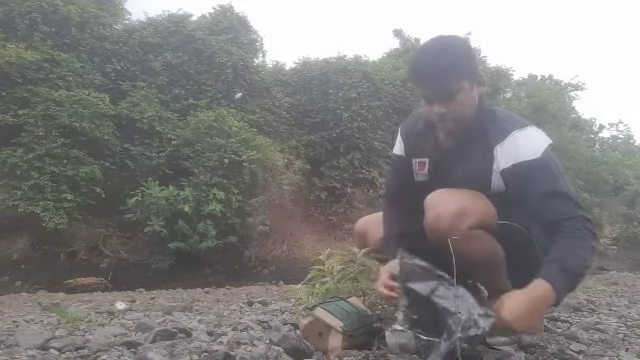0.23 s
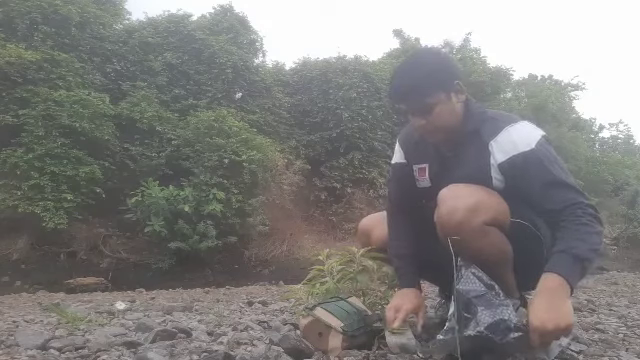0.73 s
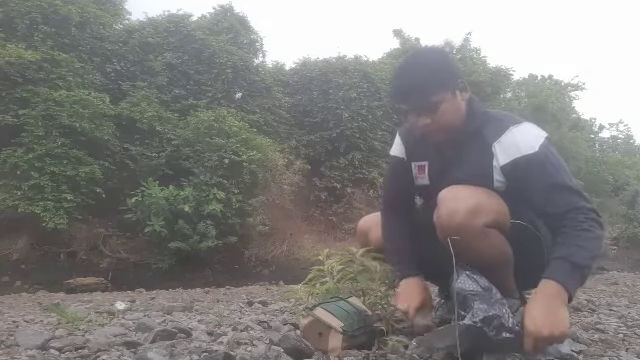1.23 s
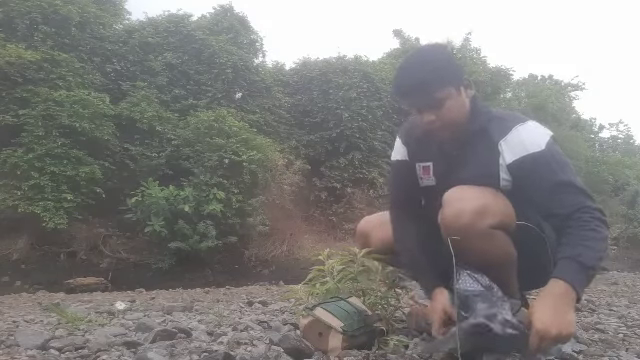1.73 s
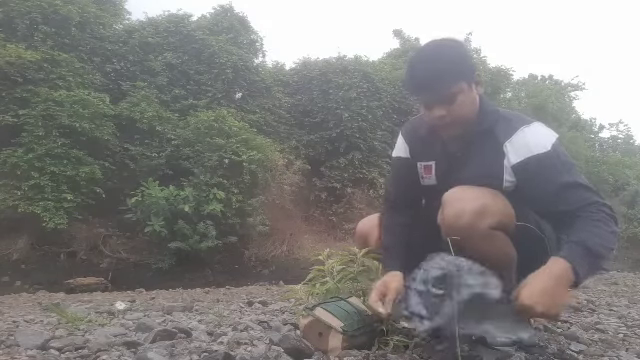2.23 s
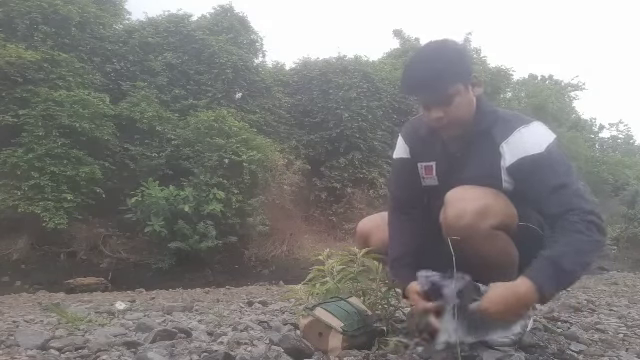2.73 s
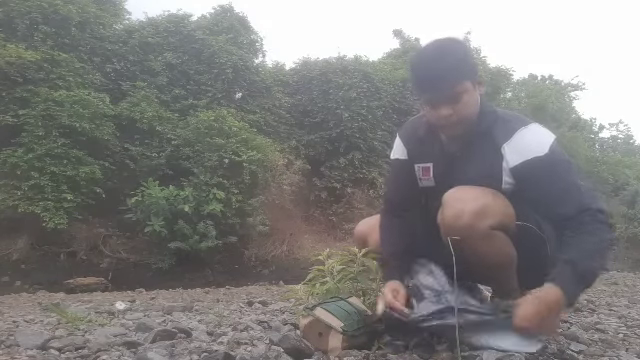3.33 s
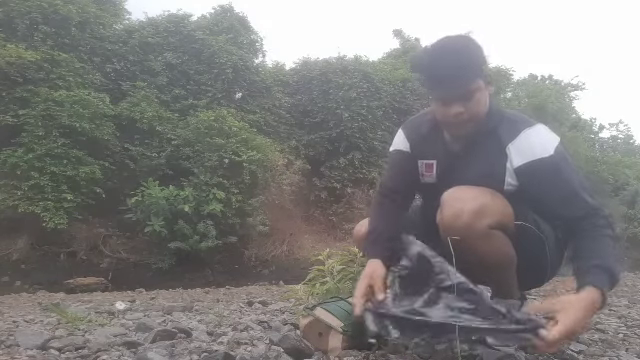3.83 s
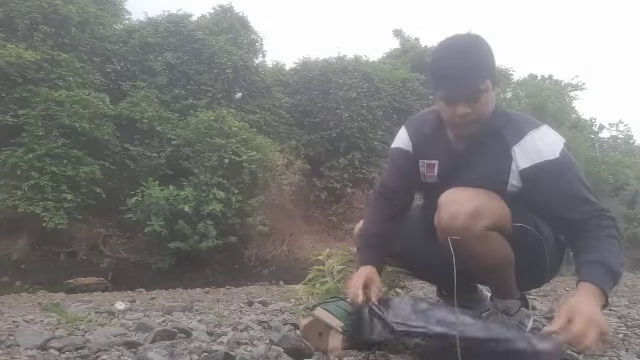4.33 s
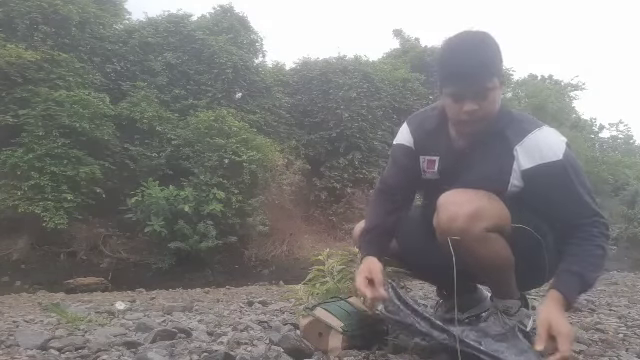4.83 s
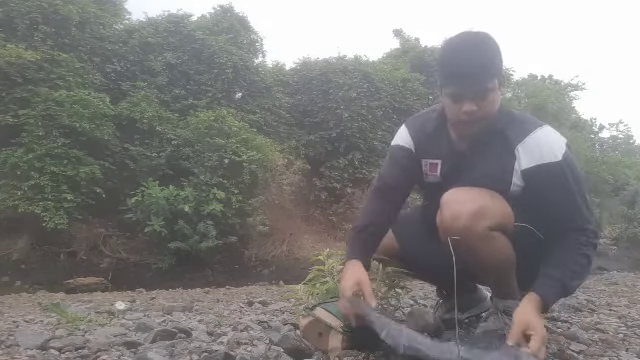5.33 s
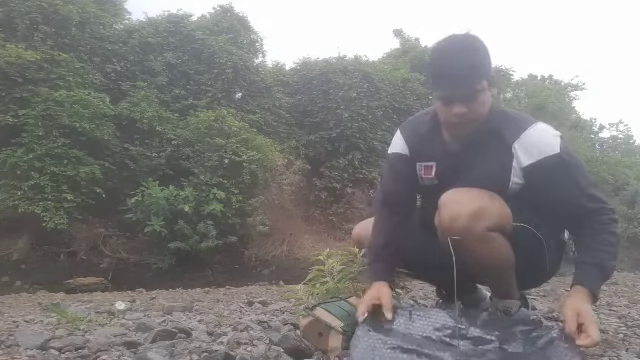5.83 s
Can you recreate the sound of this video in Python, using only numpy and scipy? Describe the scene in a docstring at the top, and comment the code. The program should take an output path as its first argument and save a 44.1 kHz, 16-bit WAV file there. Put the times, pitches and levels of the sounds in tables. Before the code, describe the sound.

Outdoors on stony ground, a small bird keeps chirping one quick phrase from the bushes while thin plastic is handled near the microphone. The crinkling starts lightly, pauses around a single stone clack, then returns in denser, snapping bursts as the sheet is opened out. Finally it is spread with soft low gusts and a few slaps on the ground. The background is a very faint hush.

```python
"""Outdoors on stony ground, the microphone close to a thin plastic sheet being shaken open and spread.
Creases buckle in dense crackling bursts, single folds snap, pockets of the sheet slap the ground and a
stone clacks; each swing pushes a low puff of air at the microphone. From the bushes a small bird repeats
one four-note phrase; a farther one trills once and drops two whistles, over a faint outdoor hush."""
import sys
import numpy as np
from scipy import signal
from scipy.fft import rfft, irfft, next_fast_len
from scipy.io import wavfile
from scipy.ndimage import uniform_filter1d, map_coordinates

SR = 44100
rng = np.random.default_rng(int(sys.argv[2]) if len(sys.argv) > 2 else 0)


def unload_audio(sound):
    """Save the sound as a 16-bit wav file, at the path given as the first command line argument."""
    columns = np.transpose(np.atleast_2d(sound))
    # keep every value between -1 and 1, then stretch to whole-number steps
    steps = np.round(np.clip(columns, -1, 1) * 32767)
    wavfile.write(sys.argv[1], SR, steps.astype(np.int16))


N = 267687

# Effort of the hands, one curve a movement. Each point: time in seconds, effort in dB.
MOVEMENTS = [
    [(0, -52), (.028, -41), (.13, -48), (.17, -55.5), (.23, -50), (.3, -67.5), (.43, -63)],
    [(.45, -53.5), (.52, -49), (.6, -50.5), (.64, -52.5), (.675, -56)],
    [(.69, -62.5), (.83, -76), (1.04, -61), (1.15, -67), (1.25, -82), (1.37, -55), (1.41, -69)],
    [(1.45, -53.5), (1.56, -74), (1.588, -55.5), (1.61, -70.5), (1.8, -76.5)],
    [(1.82, -49.5), (1.95, -42.5), (2.005, -41.5)],
    [(2.02, -37), (2.064, -34), (2.12, -41), (2.17, -37.5), (2.21, -54)],
    [(2.235, -71), (2.38, -51), (2.41, -56)],
    [(2.43, -60), (2.52, -46), (2.58, -53.5)],
    [(2.6, -44.5), (2.69, -41.5), (2.74, -40), (2.82, -36.5), (2.86, -45.5), (2.88, -38.5)],
    [(2.9, -50), (2.974, -43.5), (3.03, -47.5)],
    [(3.07, -54.5), (3.15, -45.5), (3.19, -55.5)],
    [(3.21, -47), (3.29, -44)],
    [(3.31, -42.5), (3.35, -35.5), (3.45, -33), (3.53, -38.5), (3.57, -44)],
    [(3.6, -58), (3.7, -49), (3.77, -50.5)],
    [(3.785, -45.5), (3.82, -42.5), (3.87, -52), (3.96, -50)],
    [(3.98, -42.5), (3.99, -35.5), (4.04, -36.5), (4.25, -37), (4.3, -48.5)],
    [(4.33, -55.5), (4.51, -51), (4.67, -42.5), (4.69, -52)],
    [(4.71, -52), (4.84, -52), (4.88, -53)],
    [(4.91, -70), (5.0, -61), (5.09, -48), (5.2, -55), (5.29, -55.5), (5.34, -66.5), (5.41, -58.5)],
    [(5.43, -41), (5.47, -48.5), (5.61, -34), (5.7, -37.5), (5.765, -33)],
    [(5.785, -41.5), (5.84, -39), (5.9, -36), (5.92, -47.5)],
    [(5.95, -40.5), (6.0, -61.5), (6.07, -45.5)],
]
# What buckles in each movement. Each row: tilt towards large folds in dB, lift of fine creases in dB.
FOLD_BALANCE = [(-0.5, 1.5), (0, 5), (0, -12), (-1.5, -2), (0, 1.5), (1, 6), (1, 13), (-0.5, 4.5),
                (-0.5, 2.5), (-0.5, -0.5), (-0.5, 6.5), (-2, -3.5), (0.5, 0.5), (-4.5, 7), (-1.5, 1.5),
                (0, 2.5), (-1.5, 1), (-5.5, -4.5), (-6, 3), (-2, 0.5), (0.5, -4), (-1.5, -3)]
# The sheet's five ranges, low to high. Each row: frequency in Hz, relative spectral density in dB.
BODY_SPECTRUM = [(120, -6), (250, -4.5), (550, 2.5), (900, -7.5), (1500, -5.5)]
CRACKLE_SPECTRUM = [(450, -9), (750, -5.5), (1300, -4.5), (1800, -1), (2300, -9), (2900, -49)]
CRISP_SPECTRUM = [(2100, -12.5), (2700, 1), (3400, 1), (4800, -5), (6500, -10.5), (8500, -50)]
SIZZLE_SPECTRUM = [(5000, -3), (6800, -0.5), (8000, 0), (11500, -9.5), (13000, -27), (15500, -27)]
SHEEN_SPECTRUM = [(11000, -12), (12500, 3), (15700, -2)]
# Single folds. Each row: start in seconds, ring peak in dB, pitch in Hz, tick against the ring in dB.
FOLD_SNAPS = [(0.023, -27.5, 1200, -6), (0.051, -38, 3570, -2), (.221, -32, 4530, -30),
              (.357, -45.5, 3450, -15), (.4519, -41, 3130, -6), (.508, -32, 3150, -8),
              (0.537, -26.5, 2000, -13), (0.5529, -23.5, 3740, -5.5), (0.5993, -33, 1970, -1.5),
              (0.7424, -41, 3780, -23), (0.9124, -40.5, 2900, -32), (.9847, -45, 2500, -6),
              (1.0184, -43.5, 2280, -20), (1.034, -45, 3060, -8), (1.052, -42, 2975, -22),
              (1.079, -45, 1310, -26), (1.1508, -37.5, 3420, -20), (1.1734, -39.5, 1920, -30),
              (1.3053, -43.5, 2650, -30), (1.363, -35, 2500, -36), (1.416, -37, 2570, -26),
              (1.491, -38.5, 1800, -15), (1.5836, -38, 3030, -16), (1.8192, -35, 1520, -22),
              (1.925, -26.5, 1510, -11), (2.073, -18.5, 1090, 0.5), (2.1375, -16, 2020, -9),
              (2.1837, -22, 5000, -23), (2.212, -35, 2500, -2), (2.2927, -35.5, 3460, -7),
              (2.339, -32.5, 3470, -4), (2.375, -23.5, 3960, -4), (2.569, -33.5, 1910, -22),
              (2.5935, -27.5, 1830, -30), (2.6912, -20.5, 1800, -10), (2.7171, -24.5, 2050, -6),
              (2.7823, -21.5, 1700, -1), (2.816, -27, 1870, 2), (2.8444, -34, 3210, 2),
              (2.8744, -27.5, 1360, -2), (2.964, -31, 2920, -23), (2.9938, -33, 3050, -3),
              (3.2617, -23, 2750, -7), (3.3071, -26, 1660, -2), (3.392, -17, 1940, -3),
              (3.45, -20, 1370, -12), (3.474, -31, 1970, 0), (3.5075, -25.5, 2370, 1),
              (3.686, -30, 3500, -1.5), (3.782, -30, 2830, 2.5), (3.905, -25, 4400, -19),
              (3.9872, -21, 1570, -10), (4.094, -23, 1460, 2), (4.1573, -24, 1530, -12),
              (4.1946, -15.5, 1940, -12), (4.33, -34.5, 4400, -12), (4.5513, -25.5, 2920, -36),
              (4.6626, -27, 1760, -7), (4.7266, -29, 3260, -30), (4.832, -30, 3100, -16),
              (4.8634, -27, 3010, -15), (5.0683, -26, 3210, -5.5), (5.1604, -29.5, 2790, -19),
              (5.28, -29.5, 3630, -10), (5.4252, -23.5, 3120, -19), (5.4515, -23, 2500, -23),
              (5.48, -24.5, 3200, -14), (5.499, -27, 2650, -8), (5.7983, -25, 1800, -10),
              (5.906, -23, 970, -26), (6.026, -36.5, 3050, -17)]
# Pockets hitting the ground. Each row: start in seconds, level in dB, pitch in Hz, t60 in seconds.
POCKET_SLAPS = [(1.436, -31, 300, 0.026), (1.46, -40.5, 290, 0.053), (1.495, -40, 248, 0.032),
                (3.988, -24, 500, 0.014), (5.21, -31, 247, 0.052), (5.222, -29.5, 110, 0.13),
                (5.426, -29, 310, 0.024), (5.798, -18, 598, 0.03), (5.838, -19.5, 745, 0.021),
                (5.9302, -8.5, 562, 0.011), (5.934, -20.5, 181, 0.073), (5.936, -9.5, 496, 0.012)]
# One stone tipping against another. Each row: contact time in seconds, level in dB.
STONE_CONTACTS = [(1.431, -29), (1.432, -20), (1.4343, -20)]
# The stone's modes. Each row: frequency in Hz, relative level in dB, t60 in seconds.
STONE_MODES = [(1540, -4, 0.02), (2140, -13, 0.019), (2620, 0, 0.0085), (3830, 0, 0.0053),
               (5800, -14, 0.0088), (8650, -26, 0.0046)]
# Swings that push air. Each row: peak time in seconds, air strength in dB, fall in dB per second.
SHEET_SWINGS = [(.038, -67, 130), (.632, -64.5, 209), (1.441, -56.5, 92), (1.82, -62, 130),
                (2.158, -45, 282), (2.82, -53, 130), (3.33, -61, 45), (3.52, -49, 253), (3.998, -43.5, 66),
                (4.65, -61.5, 75), (5.16, -47, 107), (5.21, -39, 200), (5.442, -40.5, 87), (5.56, -44, 31),
                (5.66, -38.5, 100), (5.74, -37.5, 58), (5.805, -27, 144), (5.87, -31.5, 200),
                (5.93, -43, 453.5)]
# Air at the microphone, low and lower. Each row: frequency in Hz, relative spectral density in dB.
PUFF_SPECTRUM = [(40, -65), (80, -2), (130, -3), (200, -7), (300, -11.5)]
HEAVE_SPECTRUM = [(22, -36), (40, -12), (62, -7), (80, -5), (110, -23)]
# The near bird's four notes. Each point: seconds from the phrase time, pitch in Hz, relative level in dB.
PHRASE_NOTES = [
    [(-.033, 4720, -23), (-.022, 4790, -9.5), (-.012, 4930, -4.5), (-.004, 4750, 4.5), (.002, 4600, -8)],
    [(.004, 5480, -13), (.018, 5620, -11), (.033, 6070, -5.5), (.048, 6670, -7.5), (.057, 6830, 0),
     (.062, 6850, -45)],
    [(.085, 3850, -28), (.1, 3930, -16.5), (.114, 3860, -5.5), (.118, 3820, -42)],
    [(.116, 5200, -13), (.123, 4246, -10), (.137, 3840, -5), (.152, 3460, -8), (.168, 3260, -19),
     (.174, 3240, -26)],
]
# Its phrases. Each row: time in seconds, level in dB, offset of the two low notes in dB.
PHRASES_SUNG = [(.27, -42, -3.5), (.637, -43.5, -3.5), (1.0, -45, -1), (1.372, -44, -0.5), (1.759, -45, 0),
                (2.127, -45.5, 0.5), (2.496, -42.5, 1), (2.869, -43.5, -0.5), (3.242, -42, 2),
                (3.617, -43, 0), (4.006, -42, -6), (4.383, -45, 0.5), (4.768, -47, 3.5), (5.141, -44.5, 1),
                (5.524, -44, -6)]
# The bushes' answer. Each entry: echo against one of the four notes in dB.
NOTE_ECHO_DB = [-15.5, -5.5, -20, -6]
# The far bird's first trill chirp, then its two low whistles.
# Each row: start in seconds, length in seconds, first pitch in Hz, last pitch in Hz, level in dB.
FIRST_CHIRP = (1.198, .013, 5600, 4950, -68)
FAR_WHISTLES = [(.82, .05, 3250, 2800, -68), (1.255, .045, 3250, 2780, -66)]
# The open air all round. Each row: frequency in Hz, relative spectral density in dB.
HUSH_SPECTRUM = [(18, -35), (30, -15), (173, 7), (359, 3.5), (673, 1), (830, -9), (945, -5.5), (1970, -52),
                 (3980, -5), (5590, -12), (15500, -26)]

BODY_DB, CRACKLE_DB, CRISP_DB, SIZZLE_DB, SHEEN_DB = -10.5, -1.5, -3, -12.5, -33.5  # against the effort
BODY_GROWTH, SIZZLE_GROWTH, SHEEN_GROWTH = 1.27, 1.17, 1.54  # dB per dB of effort, about MID_EFFORT_DB
MID_EFFORT_DB, REST_DB = -45, -79  # rest: the crumpled sheet settling between movements
THUD_DB, STIR_DB = -8.5, -18.5  # folds shaken by the air, against it; air stirred, against the effort
SWING_RISE_DB_PER_S, BREEZE_DB = 496, -72.5
HUSH_DB, TOP_HZ = -68.5, 15800


def sheet_rustle():
    """Close up, the hands set five ranges of creases going, all in the same clumps."""
    effort_db, large_db, fine_db = hands()
    grown_db = lambda growth: MID_EFFORT_DB + growth * (effort_db - MID_EFFORT_DB)
    clumps = 1.1 * wobble(25) + 2.4 * wobble(140)
    low = creases(5000, 235, 1163, cycles=0.96, scatter_db=3.0, clumps_db=0.42 * clumps, blur=0.64)
    mid = creases(14000, 683, 7300, cycles=2.13, scatter_db=3.0, clumps_db=1.12 * clumps, blur=0.43)
    fine = creases(20000, 5000, 15000, cycles=4.5, scatter_db=3.3, clumps_db=0.8 * clumps, blur=0.8)
    body_gain = np.hypot(amp(grown_db(BODY_GROWTH) + large_db + BODY_DB), amp(THUD_DB) * moving_air())
    body = body_gain * coloured(low, BODY_SPECTRUM)
    crackle = amp(effort_db + large_db + CRACKLE_DB) * coloured(mid, CRACKLE_SPECTRUM)
    crisp = amp(effort_db - large_db + CRISP_DB) * coloured(mid, CRISP_SPECTRUM)
    sizzle = amp(grown_db(SIZZLE_GROWTH) + SIZZLE_DB) * coloured(fine, SIZZLE_SPECTRUM)
    sheen = amp(grown_db(SHEEN_GROWTH) + SHEEN_DB) * coloured(fine, SHEEN_SPECTRUM)
    return body + crackle + crisp + amp(fine_db - large_db) * (sizzle + sheen)


def creases(count, low_hz, high_hz, cycles, scatter_db, clumps_db, blur):
    """Creases buckle at random: short damped rings, few large and many small, over a blur of noise."""
    when, pitch, size, phase = rng.random((count, 4)).T
    hz = (low_hz * (high_hz / low_hz) ** pitch)[:, None]
    age = np.arange(256)  # samples
    rings = np.sin(2 * np.pi * (hz * age / SR + phase[:, None])) * np.exp(-age * hz / (SR * cycles))
    rings *= amp(-scatter_db * np.log(1.005 - size))[:, None]
    at = (when * N).astype(int)[:, None] + age
    grains = np.bincount(at.ravel(), rings.ravel(), N + len(age))[:N]
    return amp(clumps_db) * (unit(grains) + blur * rng.standard_normal(N))


def hands():
    """Effort in dB, and the balance of large folds and fine creases that holds through each movement."""
    (moved_db,) = curves(np.concatenate(MOVEMENTS))
    effort_db = 20 * np.log10(np.hypot(amp(moved_db), amp(REST_DB)))
    held = [(s, *balance) for move, balance in zip(MOVEMENTS, FOLD_BALANCE)
            for s in (move[0][0], move[-1][0])]
    return effort_db, *curves(held)


def fold_snaps():
    """Each fold flips in a few milliseconds: a rough ring at its own pitch and a bright tick."""
    out, t = np.zeros(N), np.arange(SR // 25) / SR
    rise = 1 - np.exp(-t / 0.00018)

    def burst(band_hz, order, t60):
        noise = rng.standard_normal(len(t)) * rise * amp(-60 * t / t60)
        band = signal.lfilter(*signal.butter(order, band_hz, "band", fs=SR), noise)
        return band / np.abs(band).max()

    for start, db, hz, tick_db in FOLD_SNAPS:
        ring = burst([0.7 * hz, 1.5 * hz], order=2, t60=0.006)
        tick = amp(tick_db) * burst([5500, 11500], order=3, t60=0.0066)
        add_at(out, start, amp(db) * (ring + tick))
    return out


def pocket_slaps():
    """A pocket of the sheet slaps the ground and rings its trapped air once."""
    out, t = np.zeros(N), np.arange(SR // 10) / SR
    for start, db, hz, t60 in POCKET_SLAPS:
        fundamental = struck_mode(t, hz, db, t60, rise_s=0.0004)
        overtone = struck_mode(t, 1.62 * hz, db - 9.5, 0.95 * t60, rise_s=0.0004)
        add_at(out, start, fundamental + overtone)
    return out


def stone_clack():
    """One stone tips against another: each contact rings a few short modes, with a burst of grit."""
    out, t = np.zeros(N), np.arange(SR // 10) / SR
    lowpass = signal.butter(2, 5500, fs=SR)
    for start, db in STONE_CONTACTS:
        ring = sum(struck_mode(t, hz, db + mode_db + rng.normal(0, 2.35), t60, rise_s=0.00022)
                   for hz, mode_db, t60 in STONE_MODES)
        grit = amp(db - 5 - 60 * t / 0.008) * signal.lfilter(*lowpass, rng.standard_normal(len(t)))
        add_at(out, start, ring + grit)
    return out


def air_puffs():
    """Low, lumpy puffs reach the near microphone; the stronger the swing, the deeper it heaves."""
    air = moving_air()
    puffs = coloured(amp(3 * wobble(25)) * rng.standard_normal(N), PUFF_SPECTRUM)
    heave = coloured(amp(3.5 * wobble(11)) * rng.standard_normal(N), HEAVE_SPECTRUM)
    return air * puffs + amp(5.5) * air ** 1.195 * heave


def moving_air():
    """Gain of the air: each swing rises fast and dies away, over the stir of the hands and a breeze."""
    t = np.arange(N) / SR
    swing_power = sum(amp(db - np.maximum(SWING_RISE_DB_PER_S * (peak_s - t), fall * (t - peak_s))) ** 2
                      for peak_s, db, fall in SHEET_SWINGS)
    stir = amp(hands()[0] + STIR_DB)
    return np.sqrt(swing_power + stir ** 2 + amp(BREEZE_DB) ** 2)


def near_bird():
    """From the bushes, one whistled phrase, a little different and a little unsteady each time."""
    out, flutter_db = np.zeros(N), 3 * wobble(150)
    for phrase_s, phrase_db, low_db in PHRASES_SUNG:
        note_levels = phrase_db + np.array([0, 0, low_db, low_db])
        for note, db, echo_db in zip(PHRASE_NOTES, note_levels, NOTE_ECHO_DB):
            when, hz, shape_db = np.transpose(note)
            t = np.arange(when[0], when[-1], 1 / SR)
            start = phrase_s + when[0]
            level_db = db + np.interp(t, when, shape_db) + flutter_db[round(start * SR):][:len(t)]
            tone = whistle(np.interp(t, when, hz), level_db)
            add_at(out, start, bushes(tone, echo_db))
    return out


def far_bird(chirp_count=8, chirp_step_s=0.0188):
    """Farther off, a trill of short falling chirps and two lower whistles, trailed by their echoes."""
    out = np.zeros(N)
    trill = [(FIRST_CHIRP[0] + k * chirp_step_s, *FIRST_CHIRP[1:]) for k in range(chirp_count)]
    for start, length, first_hz, last_hz, db in trill + FAR_WHISTLES:
        tone = whistle(np.geomspace(first_hz, last_hz, round(length * SR)), db)
        add_at(out, start, bushes(tone, echo_db=-7))
    return out


def whistle(hz, db):
    """A bird's note: a soft-edged sine following pitch and level, given per sample."""
    return amp(db) * np.sin(2 * np.pi * np.cumsum(hz) / SR) * signal.windows.tukey(len(hz), 0.15)


def bushes(direct, echo_db, t60=0.39):
    """The direct sound and its echoes scattered by the bushes, which never return alike."""
    t = np.arange(SR // 2) / SR
    tail = rng.standard_normal(len(t)) * amp(-60 * t / t60)
    echoes = signal.fftconvolve(direct, tail / np.linalg.norm(tail))
    return np.pad(direct, (0, len(t) - 1)) + amp(echo_db) * echoes


def outdoor_hush():
    """Faint, steady noise behind everything."""
    return amp(HUSH_DB) * coloured(rng.standard_normal(N), HUSH_SPECTRUM)


def struck_mode(t, hz, db, t60, rise_s):
    """A sine that rises quickly and falls 60 dB in t60 seconds."""
    return amp(db - 60 * t / t60) * np.sin(2 * np.pi * hz * t) * (1 - np.exp(-t / rise_s))


def coloured(x, spectrum):
    """x with the given spectrum in place of its own, at rms 1."""
    size = next_fast_len(N + 8192)
    bins, hz = rfft(x, size), np.fft.rfftfreq(size, 1 / SR)
    own_shape = np.sqrt(np.abs(uniform_filter1d(np.abs(bins) ** 2, size=3000))) + 1e-12
    knot_hz, knot_db = np.transpose(spectrum)
    gain = amp(np.interp(np.log(hz + 1), np.log(knot_hz + 1), knot_db, left=-120, right=-120))
    return unit(irfft(bins * gain / own_shape, size)[:N])


def wobble(rate):
    """A smooth random curve, rate knots a second."""
    return map_coordinates(rng.standard_normal(int(N * rate / SR) + 4), [np.arange(N) * rate / SR])


def curves(rows):
    """One value per sample for each column after the time."""
    times, *columns = np.transpose(rows)
    return [np.interp(np.arange(N) / SR, times, column) for column in columns]


def add_at(out, start_s, sound):
    """Mix sound into out from start_s, as far as it fits."""
    span = out[round(start_s * SR):][:len(sound)]
    span += sound[:len(span)]


def amp(db):
    """Gain of a level in dB."""
    return 10 ** (np.asarray(db) / 20)


def unit(x):
    """x at rms 1."""
    return x / np.sqrt(np.mean(x ** 2) + 1e-20)


def scene():
    """One microphone: the sheet and the stone close by, the birds and the hush beyond."""
    background = outdoor_hush()
    close = sheet_rustle() + fold_snaps() + pocket_slaps() + stone_clack() + air_puffs()
    return (close + near_bird() + far_bird() + background)[None]


def record(dry):
    """The camera's sound input keeps nothing above its band limit."""
    size = next_fast_len(N + 8192)
    passband = np.fft.rfftfreq(size, 1 / SR) < TOP_HZ
    return irfft(rfft(dry, size) * passband, size)[:, :N]


dry = scene()
out = record(dry)
unload_audio(out)
```